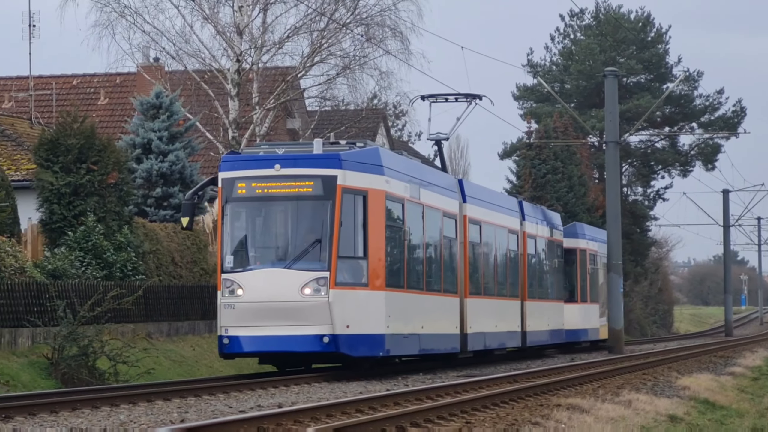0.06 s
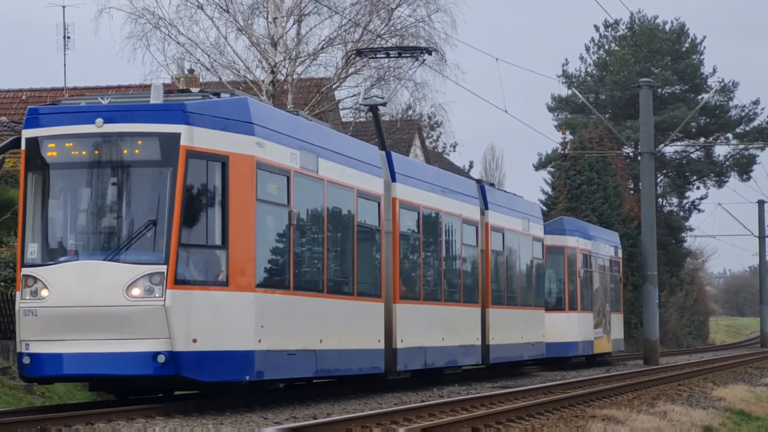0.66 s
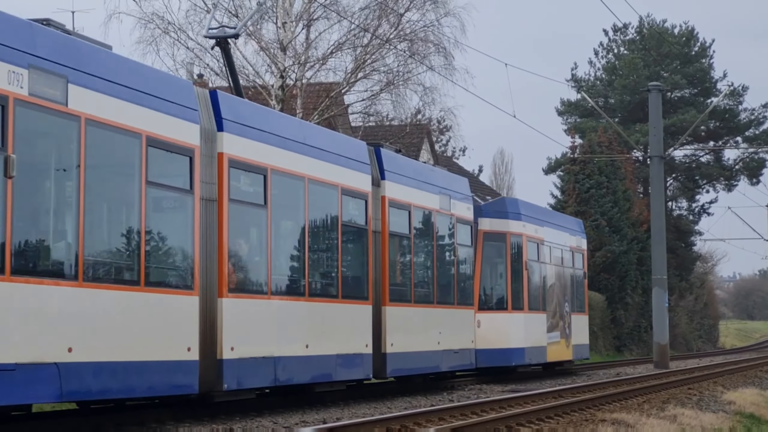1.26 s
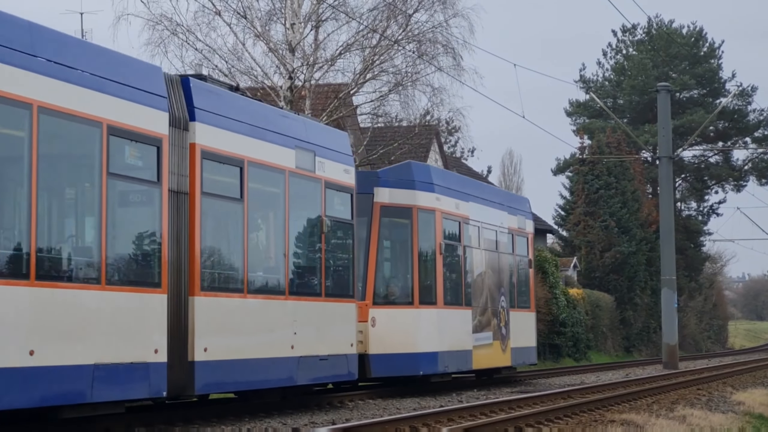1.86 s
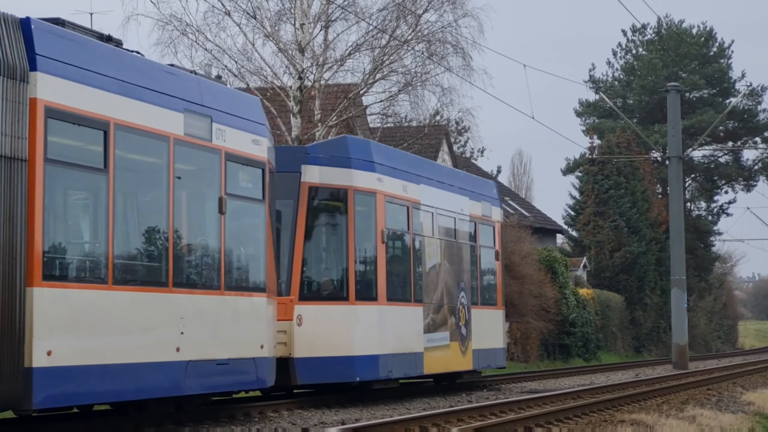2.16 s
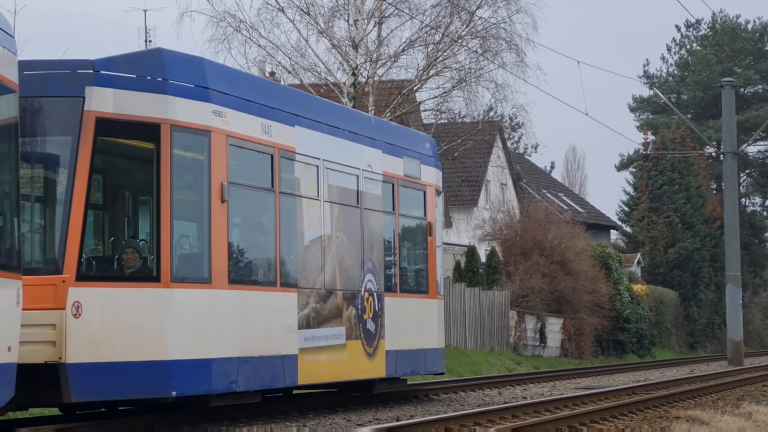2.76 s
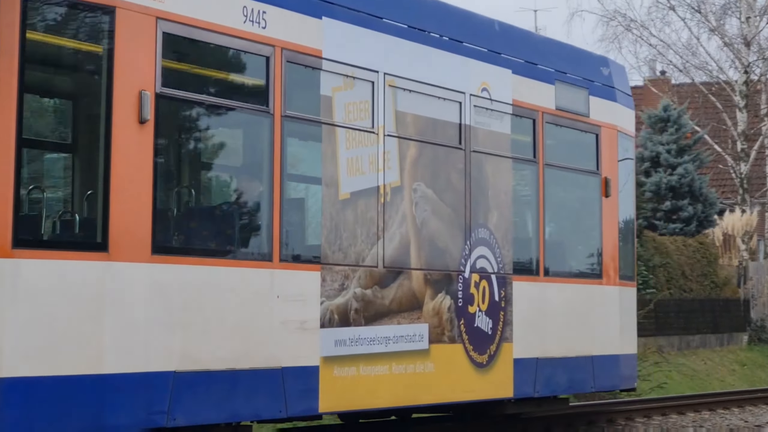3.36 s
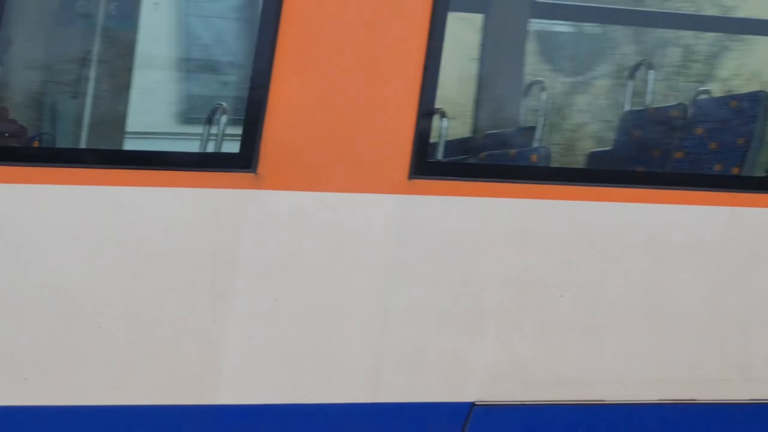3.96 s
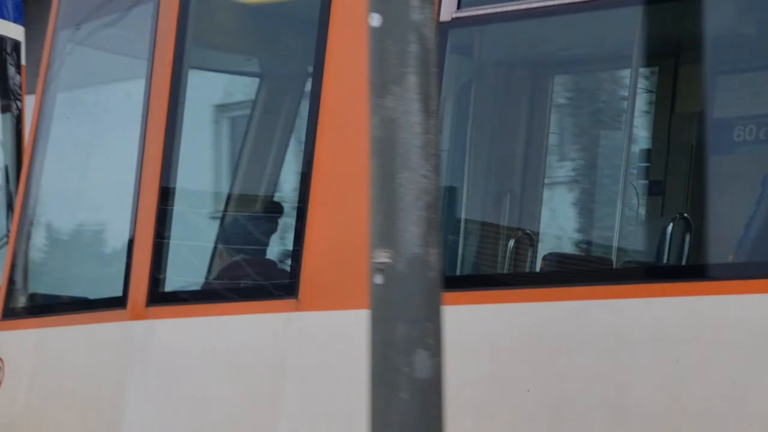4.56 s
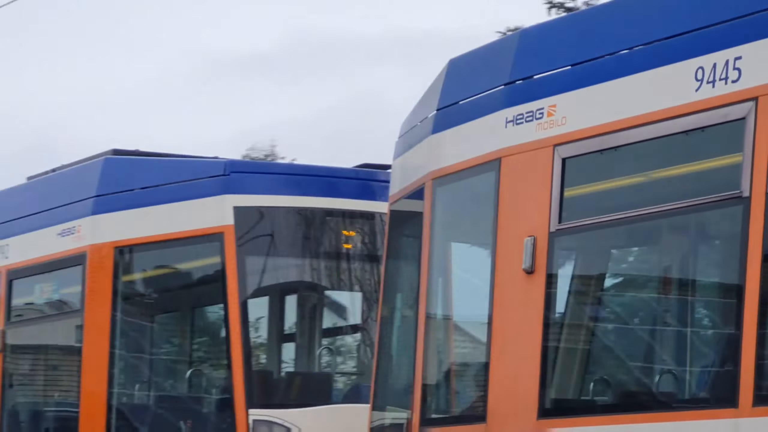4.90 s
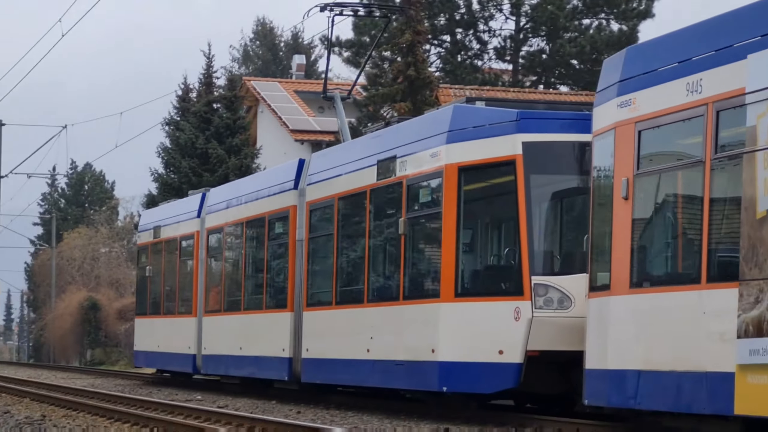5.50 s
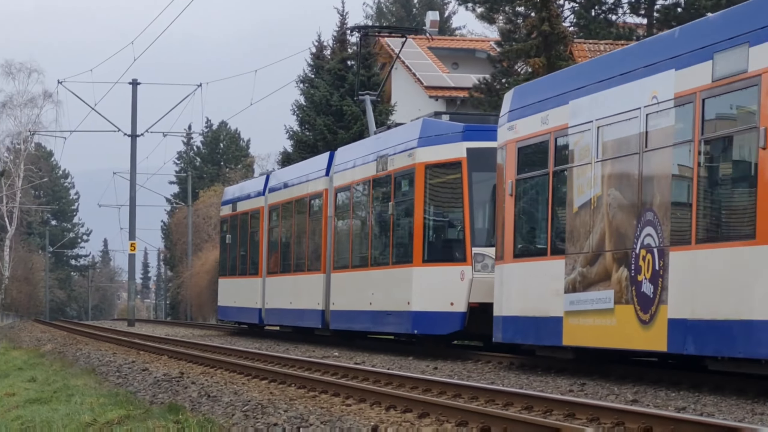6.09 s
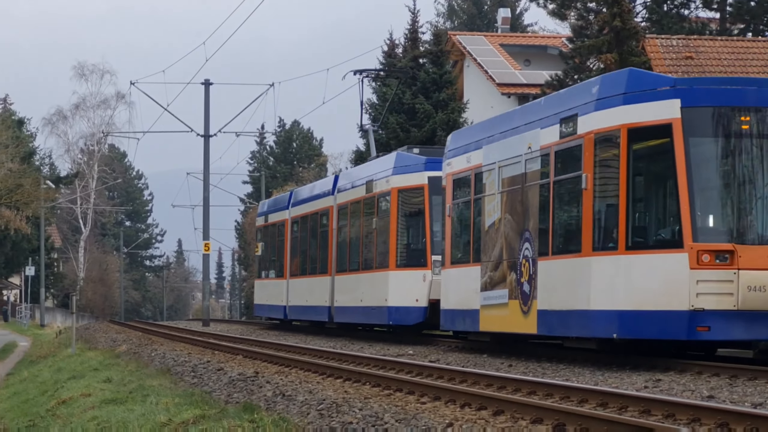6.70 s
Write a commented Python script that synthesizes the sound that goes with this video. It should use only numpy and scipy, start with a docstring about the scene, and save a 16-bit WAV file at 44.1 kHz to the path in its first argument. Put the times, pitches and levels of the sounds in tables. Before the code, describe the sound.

From the start, rails sing over a growing low drone as a tram with a trailer approaches on open outdoor track. Short gusts thump the microphone on the left, hardest from about 2.4 to 3.6 seconds, then stop. The track bed rumbles more heavily from around 1.5 seconds. Three sets of wheels pass close at roughly 2.5, 3.8 and 4.7 seconds, each a swell of steel roar, ringing and low hum that sinks slightly in pitch. Flanges rub with soft wavering squeals between 2 and 5 seconds, and the overhead wire adds a faint, thin high whine. Short metallic wheel pings dot the approach, clearest between 2 and 3.5 seconds. After 5 seconds the rumble recedes while the rails whine on, slowly fading, with a few slightly lower pings between 5.5 and 6.5 seconds. The right side sounds more muffled throughout.

```python
"""Rails sing and gusts thump the left microphone port as a tram and its trailer draw near.
They roll past on open ballasted track, 8.5 m from the microphone. The track bed rumbles under the
weight, flanges rub and sing, and three bogies go by, their wheels roaring and ringing on rough steel.
Wheels ping on blemishes, the overhead wire whines under the pantograph, and the rails whine on behind.
The right port is muffled and catches little wind."""
import sys
import numpy as np
from scipy import signal
from scipy.fft import rfft, irfft
from scipy.io import wavfile
from scipy.ndimage import uniform_filter1d

SR = 44100
rng = np.random.default_rng(int(sys.argv[2]) if len(sys.argv) > 2 else 0)


def pcm_store(signal):
    """Save signal as 16-bit PCM."""
    levels = np.round(np.clip(np.atleast_2d(signal), -1, 1) * 32767)
    wavfile.write(sys.argv[1], SR, levels.astype(np.int16).T)


N = 297234
FRAME, HOP = 2048, 512
HZ = np.fft.rfftfreq(FRAME, 1 / SR)
TIMES = np.arange(N // HOP + 2)[:, None] * HOP / SR
SPEED_M_PER_S, DISTANCE_M, SOUND_M_PER_S = 13.66, 8.5, 343


def amp(db):
    """Decibels to gain."""
    return 10 ** (np.asarray(db) / 20)


def unit_rms(x):
    """Scales to rms 1."""
    return x / np.sqrt(np.mean(x ** 2) + 1e-20)


def power_sum(gains):
    """Unrelated noises add in power."""
    return np.sqrt(sum(gain ** 2 for gain in gains))


def over_hz(rows):
    """Each column of a spectrum, interpolated to every bin."""
    hz, *columns = np.transpose(rows)
    return [np.interp(np.log(HZ + 1), np.log(hz), column) for column in columns]


def resonance(hz, half_width):
    """Gain of one resonance at every bin."""
    return 1 / (1 + ((HZ - hz) / half_width) ** 2)


def resonances(modes):
    """Joint gain of several resonances at every bin."""
    return power_sum(amp(db) * resonance(hz, half_width) for hz, half_width, db in modes)


def bump(s, half_length, t=TIMES):
    """A bell-shaped gain around time s."""
    return np.exp(-.5 * ((t - s) / half_length) ** 2)


def swell(db, rise_until_s, fall_from_s, rise_db_per_s, fall_db_per_s):
    """Gain of one long rise and fall."""
    rise_db = rise_db_per_s * np.maximum(rise_until_s - TIMES, 0)
    fall_db = fall_db_per_s * np.maximum(TIMES - fall_from_s, 0)
    return amp(db - rise_db - fall_db)


def patches(frames, bins):
    """Random field of rms 1, smooth over so many frames and bins."""
    field = rng.standard_normal((len(TIMES), len(HZ)))
    return unit_rms(uniform_filter1d(uniform_filter1d(field, frames, 0), bins, 1))


def wobble(low_hz, high_hz):
    """Slow random curve of rms 1 between two rates."""
    hz = np.fft.rfftfreq(N, 1 / SR)
    return unit_rms(irfft(rfft(rng.standard_normal(N)) * (hz > low_hz) * (hz < high_hz), N))


def white_spectra():
    """Short-time spectra (frames, bins) of white noise."""
    noise = rng.standard_normal((len(TIMES) - 1) * HOP) * np.sqrt(SR / 2)
    return signal.stft(noise, nperseg=FRAME, noverlap=FRAME - HOP)[2].T


def to_sound(spectra):
    """Short-time spectra back to a waveform."""
    return signal.istft(spectra.T, nperseg=FRAME, noverlap=FRAME - HOP)[1][:N]


# Turbulent air right on the microphone port. Each row: frequency in Hz, level in dB.
EDDY_SPECTRUM = [(20, -35), (38, -5.5), (60, 4.5), (130, 0.5), (185, -8.5), (255, -4.5), (370, -16.5),
                 (520, -29.5), (900, -53), (3000, -90)]
def turbulence(count, tilt_db):
    """Eddy noise of rms 1, tilted by tilt_db an octave from 130 to 520 Hz."""
    hz = np.fft.rfftfreq(count, 1 / SR)
    octaves = np.log2(np.clip(hz / 130, 1, 4))
    colour_db = np.interp(hz, HZ, over_hz(EDDY_SPECTRUM)[0]) + tilt_db * octaves
    return unit_rms(irfft(rfft(rng.standard_normal(count)) * amp(colour_db), count))


# Spells of breeze on the left port. Each row: centre and half length in seconds, level in dB.
BREEZE_SPELLS = [(0.467, 0.094, -35), (1.347, 0.36, -38), (2.78, 0.25, -24), (3.4, 0.25, -25)]
def breeze(lumpy_db=4):
    """Unsteady air rumbles on the port."""
    t = np.arange(N) / SR
    spells = power_sum(amp(db) * bump(s, half_length, t) for s, half_length, db in BREEZE_SPELLS)
    return spells * amp(lumpy_db * wobble(3.8, 25)) * turbulence(N, tilt_db=-3.0)


# The hardest gusts on the left port. Each row: centre and half length in seconds, strength in dB.
HARD_GUSTS = [(0.34, 0.014, -17), (.396, .013, -23), (0.567, 0.014, -20.5), (0.893, 0.01, -20.5),
              (1.0, 0.0087, -20), (1.098, 0.014, -21.5), (1.248, 0.0095, -21), (1.314, 0.014, -20.5),
              (2.407, .013, -16.5), (2.576, 0.023, -17.5), (2.791, 0.048, -15), (2.889, 0.012, -10),
              (2.957, 0.011, -13.5), (3.071, 0.019, -13.5), (3.255, 0.007, -13), (3.363, 0.027, -14),
              (3.408, 0.012, -9.5), (3.512, 0.0092, -12.5), (3.593, 0.013, -11.5)]
def gusts(gain_db=-1.5, tilt_per_db=1.1, neutral_db=-16):
    """Eddies thump on the port; harder gusts hold smaller eddies and reach higher."""
    out = np.zeros(N)
    t = (np.arange(4 * FRAME) - 2 * FRAME) / SR
    for s, half_length, db in HARD_GUSTS:
        envelope = bump(0, half_length, t)
        eddy = unit_rms(envelope * turbulence(len(t), tilt_per_db * (db - neutral_db)))
        start = round(s * SR) - 2 * FRAME
        out[start:start + len(t)] += amp(db + gain_db) * eddy * np.sqrt(np.mean(envelope ** 2))
    return out


# The ballasted bed under the tram. Each row: frequency in Hz, level in dB.
BED_SPECTRUM = [(20, -37), (40, -31), (72, -4.5), (110, -14), (180, -25), (500, -80), (1500, -80)]
# Weight rolling onto the bed. Each row: centre and half length in seconds, level in dB.
BED_BOOMS = [(1.577, 0.13, -37.5), (2.362, 0.036, -31.5)]
def track_bed(uneven_db=1.5):
    """The bed rumbles unevenly under the whole tram and booms as the weight arrives."""
    rumble = swell(-44, rise_until_s=2, fall_from_s=2.5, rise_db_per_s=3, fall_db_per_s=1.73)
    rumble = rumble * amp(uneven_db * patches(frames=12, bins=30))
    booms = [amp(db) * bump(s, half_length) for s, half_length, db in BED_BOOMS]
    return power_sum([rumble, *booms]) * amp(over_hz(BED_SPECTRUM)[0])


# The low note down the line. Each row: frequency and half width in Hz, level in dB.
LOW_MODES = [(94.7, 6.8, 1)]
def low_drone():
    """The rails carry a low drone ahead of the tram."""
    level = swell(-41.5, rise_until_s=0.7, fall_from_s=3.04, rise_db_per_s=14, fall_db_per_s=17)
    return resonances(LOW_MODES) * level


# The wire above the track. Each row: frequency and half width in Hz, level in dB.
OVERHEAD_MODES = [(9100, 70, -8), (10130, 130, -1), (11900, 260, 1.5), (13620, 140, -3.5),
                  (12500, 4500, -5.5)]
def overhead_wire(waver_db=1.0):
    """The wire whines thinly under the pantograph."""
    level = swell(-84, rise_until_s=1.25, fall_from_s=3.5, rise_db_per_s=4.9, fall_db_per_s=5)
    return resonances(OVERHEAD_MODES) * level * amp(waver_db * patches(frames=5, bins=14))


# The rails as the tram nears the microphone. Each row: frequency and half width in Hz, level in dB.
RAIL_AHEAD_MODES = [(708, 97, -8.5), (970, 185, -8.5), (1253, 59, -4.5), (1424, 12.5, 3), (1693, 15, -9),
                    (2043, 62, -4.5), (2460, 210, -17), (3580, 57, -16), (4220, 62, -15),
                    (5760, 260, -20.5), (6800, 420, -19.5)]
def rails_ahead(waver_db=1.77, throb_hz=9.5, throb_db=0.8):
    """The rails carry the tram's shaking far ahead in narrow bands that pulse lightly."""
    level = swell(-59, rise_until_s=1.63, fall_from_s=2, rise_db_per_s=5, fall_db_per_s=3)
    waver = amp(waver_db * patches(frames=5, bins=14))
    throb = amp(throb_db * np.sin(2 * np.pi * throb_hz * TIMES))
    return resonances(RAIL_AHEAD_MODES) * level * waver * throb


# The rails as the tram draws away. Each row: frequency and half width in Hz, level in dB.
RAIL_BEHIND_MODES = [(710, 91, -16.5), (1176, 96, -1), (1296, 89, -2.5), (1750, 185.0, -18.5),
                     (2530, 240, -13), (5380, 420, -21.5)]
def rails_behind(waver_db=1.6):
    """The rails carry the shaking back along the line and whine on."""
    level = swell(-57.5, rise_until_s=5.5, fall_from_s=5, rise_db_per_s=3, fall_db_per_s=2.5)
    return resonances(RAIL_BEHIND_MODES) * level * amp(waver_db * patches(frames=5, bins=14))


# Flanges on the rail, heard from the trackside.
# Each row: centre and half length in seconds, frequency and half width in Hz, level in dB.
FLANGE_RUBS = [(0.08, 0.075, 1528, 22.3, -58), (0.262, .05, 1860, 102, -70.5),
               (1.85, 0.28, 3550, 61.6, -67), (2.122, 0.42, 693, 51, -54.5), (2.38, 0.66, 4175, 97, -62.5),
               (2.544, 0.32, 1700, 180, -60), (3.265, 0.35, 1262, 67, -53.5),
               (3.812, 0.12, 2440, 86, -55.5), (4.014, 0.18, 2015, 403, -62.5),
               (4.57, 0.48, 2560, 178, -59)]
def flange_squeals(waver_db=0.9):
    """Each rub of a flange swells and fades unsteadily in one narrow band."""
    rubs = power_sum(amp(db) * bump(s, half_length) * resonance(hz, half_width)
                     for s, half_length, hz, half_width, db in FLANGE_RUBS)
    return rubs * amp(waver_db * patches(frames=6, bins=4))


# Wheels striking blemishes along the track. Each row: start in seconds, pitch in Hz, level in dB.
WHEEL_KNOCKS = [(.76, 1425, -29), (1.0, 1440, -30), (1.818, 1454, -29.5), (2.10, 1436, -23.5),
                (2.949, 1286, -26), (3.243, 1277, -19), (3.538, 1258, -18.5), (5.519, 1130, -26),
                (5.98, 1136, -26.5), (6.43, 1215, -32), (6.511, 1203, -26.5)]
def wheel_pings(t60_s=0.078, rise_s=0.0019, right_lag_s=0.00077, gone_by_s=4.5):
    """One wheel mode rings after each knock, reaching the left port first until the tram has gone by."""
    out = np.zeros((2, N))
    for s, hz, db in WHEEL_KNOCKS:
        lag_s = np.array([[0], [right_lag_s * (s < gone_by_s)]])
        t = np.maximum(np.arange(4 * FRAME) / SR - lag_s, 0)
        envelope = amp(db - 60 * t / t60_s) * (1 - np.exp(-t / rise_s))
        ring = envelope * np.sin(2 * np.pi * hz * t)
        span = out[:, round(s * SR):][:, :4 * FRAME]
        span += ring[:, :span.shape[1]]
    return out


def passing(abreast_s):
    """A bogie's range in decades beyond its nearest, its facing (+1 coming, -1 going) and Doppler."""
    ahead_m = SPEED_M_PER_S * (abreast_s - TIMES)
    range_m = np.hypot(ahead_m, DISTANCE_M)
    facing = ahead_m / range_m
    doppler = 1 / (1 - facing * SPEED_M_PER_S / SOUND_M_PER_S)
    return np.log10(range_m / DISTANCE_M), facing, doppler


def gear_hum(decades, doppler, hum_hz=71.8, half_width_hz=7.1, fade_db=44):
    """The running gear hums in a narrow low band that sinks as it goes by."""
    return amp(-fade_db * decades) * resonance(hum_hz * doppler, half_width_hz)


# Bogie frames and car panels. Each row: frequency in Hz, level in dB.
BODY_SPECTRUM = [(100, -16), (190, -16.5), (245, -1), (310, -2), (430, -11.5), (540, -67), (1500, -60)]
def body_drone(decades, facing, fade_db=42, ahead_loss_db=1.5):
    """A bogie shakes the car body, which drones more toward the rear."""
    return amp(over_hz(BODY_SPECTRUM)[0] - fade_db * decades - ahead_loss_db * facing)


# The resonances of a steel wheel. Each row: frequency and half width in Hz, level in dB.
RING_MODES = [(454, 21, -6), (1750, 300, -3.5), (2900, 190, -6.5), (3620, 63, -6.5), (4050, 170, -2.5),
              (5590, 170, -8), (7300, 300, -13), (11200, 195, -19)]
def wheel_ringing(decades, doppler, fade_db=49):
    """The wheels ring in their modes, which sink in pitch as they go by."""
    return amp(-fade_db * decades) * np.interp(HZ / doppler, HZ, resonances(RING_MODES))


# Wheels on rough steel, abreast of the microphone. Each row: frequency in Hz, level in dB.
ROAR_SPECTRUM = [(300.0, -20), (540.0, -13.5), (700.0, -1.3), (900.0, -10.5), (1300.0, -7.5),
                 (2000.0, -7.5), (2500.0, -2), (3100.0, -8.5), (4100.0, -6.5), (4900.0, -10), (7200.0, -17),
                 (8300.0, -23.5), (11500.0, -25.5), (15500.0, -31)]
def wheel_roar(decades, facing, bright_db, fade_db=40.5, ahead_loss_db=5):
    """Rough wheels roar on rough rails and radiate mostly sideways, so the roar fades fast with range."""
    octaves = np.log2((HZ + 20) / 2000)
    # thin and bright toward the front, full toward the rear; the middle is lost over the ballast
    tilt_db = bright_db + 1.53 * facing + 4.5 * decades
    loss_db = fade_db * decades + ahead_loss_db * facing
    return amp(over_hz(ROAR_SPECTRUM)[0] - loss_db + tilt_db * octaves)


# Bogies passing 8.5 m from the microphone. Each row: time abreast in seconds, roar level in dB,
# roar brightness in dB per octave, then the levels of body drone, wheel ringing and hum in dB.
BOGIE_PASSES = [(2.49, -59, 0.6, -55, -58, -43), (3.79, -58.5, -0.23, -54.5, -62, -40),
                (4.67, -62.5, -0.4, -53, -64.5, -43.5)]
def bogies(flurry_db=1.0, flicker_db=2.27):
    """Each bogie roars, drones, rings and hums, loudest about when it is abreast."""
    flurries = amp(flurry_db * patches(frames=5, bins=30))
    # brief, narrow random flickers of pitch in the roar
    flickers = amp(flicker_db * patches(frames=12, bins=3))
    gains = []
    for abreast_s, roar_db, bright_db, body_db, ring_db, hum_db in BOGIE_PASSES:
        decades, facing, doppler = passing(abreast_s)
        gains += [amp(roar_db) * wheel_roar(decades, facing, bright_db) * flurries * flickers,
                  amp(body_db) * body_drone(decades, facing),
                  amp(ring_db) * wheel_ringing(decades, doppler),
                  amp(hum_db) * gear_hum(decades, doppler)]
    return power_sum(gains)


# The muffled right port against the left. Each row: frequency in Hz, dB tram coming, dB tram going.
RIGHT_PORT_RESPONSE = [(152, -0.5, 0), (420, 5.5, 2.5), (520, -6.5, -0.5), (736, -3.5, -8.5),
                       (857, 1.5, 4.5), (1264, 2, -8), (1550, 5, 7), (2170, -4, -8), (3070, -9.5, -6.5),
                       (4200, -13, -13.5), (5000, -20.5, -19), (7000, -34.5, -33), (15000, -31, -25)]
# How alike the ports sound. Each row: frequency in Hz, coherence (0-1) tram coming, then tram going.
PORT_COHERENCE = [(40, 0.76, 0.82), (330, 0.93, 1), (620, 0, 0.8), (1070, 0.99, 1), (2100, 0.58, 0.65),
                  (2950, 0.62, 0), (4500, 0, 0.1), (7000, 0, .1)]
def at_ports(gain, turn_s=3.95, turn_length_s=0.86, lag_coming_s=0.00059, lag_going_s=-0.00014):
    """Noise shaped by gain at both ports: wheels coming reach the left first, those going the right."""
    gone = np.clip((TIMES - turn_s) / turn_length_s, 0, 1)
    blend = lambda coming, going: coming + gone * (going - coming)
    delay = lambda s: np.exp(-2j * np.pi * HZ * s)
    alike_coming, alike_going = np.clip(over_hz(PORT_COHERENCE), 0, .99)
    coherence = blend(alike_coming * delay(lag_coming_s), alike_going * delay(lag_going_s))
    left = white_spectra()
    right = coherence * left + np.sqrt(1 - abs(coherence) ** 2) * white_spectra()
    right *= amp(blend(*over_hz(RIGHT_PORT_RESPONSE)))
    return np.array([to_sound(gain * left), to_sound(gain * right)])


def scene(wind_leak_db=-24):
    """The tram from the trackside, with wind mostly on the left port."""
    tram = at_ports(power_sum([bogies(), flange_squeals(), track_bed(), low_drone(),
                               rails_ahead(), rails_behind(), overhead_wire()]))
    wind = (breeze() + gusts()) * np.array([[1], [amp(wind_leak_db)]])
    return tram + wheel_pings() + wind


def record(dry, edge_hz=15400):
    """The recorder's band limit."""
    lowpass = signal.firwin(511, edge_hz, window=("kaiser", 9), fs=SR)
    return signal.oaconvolve(dry, lowpass[None], "same")


dry = scene()
out = record(dry)
pcm_store(out)
```